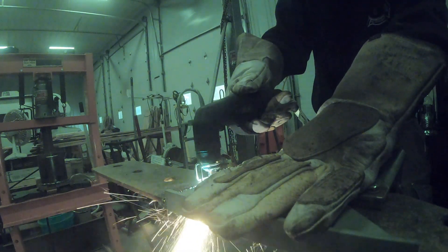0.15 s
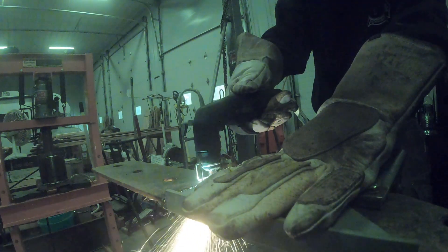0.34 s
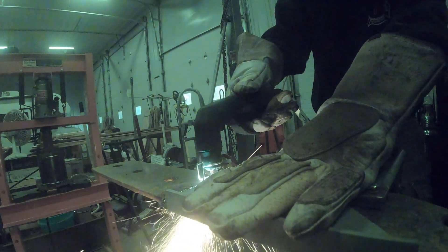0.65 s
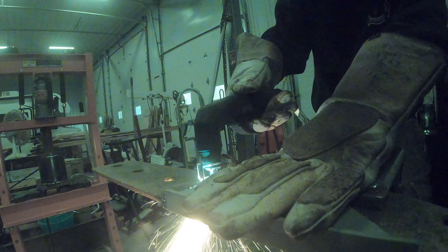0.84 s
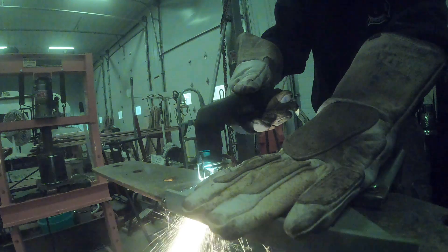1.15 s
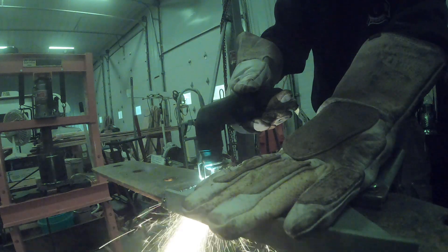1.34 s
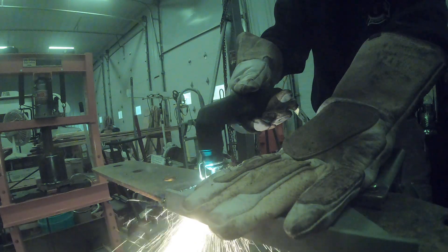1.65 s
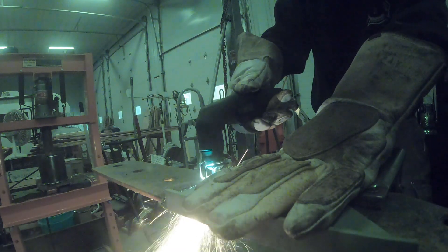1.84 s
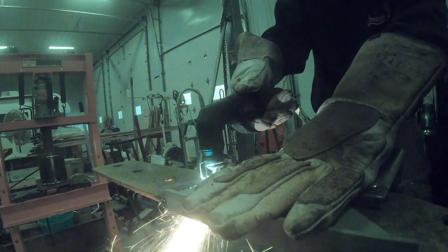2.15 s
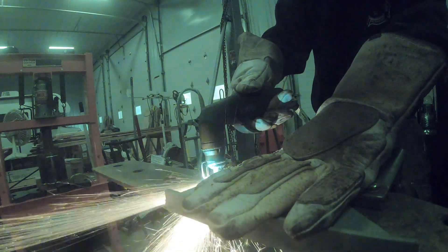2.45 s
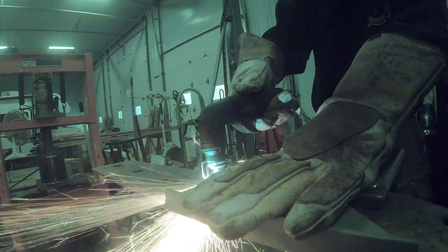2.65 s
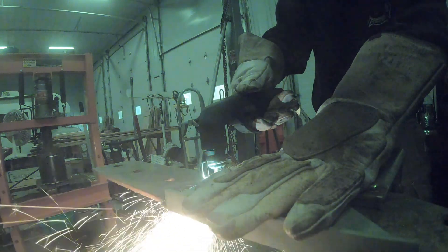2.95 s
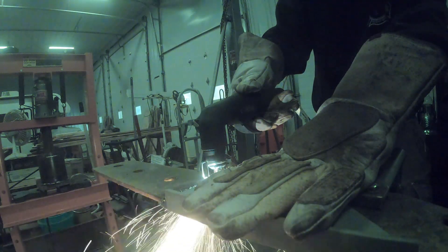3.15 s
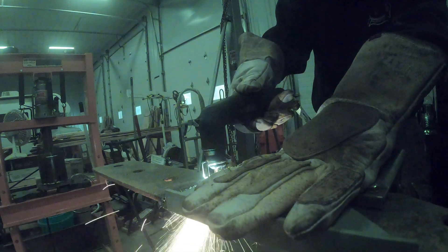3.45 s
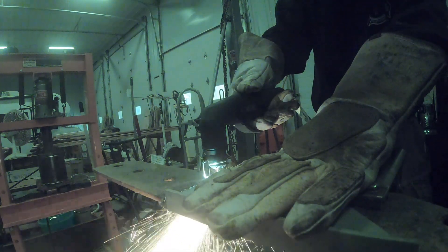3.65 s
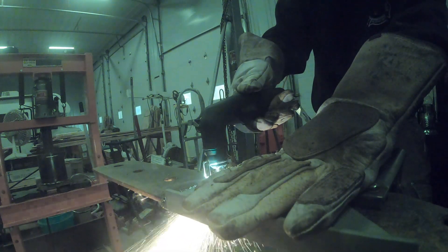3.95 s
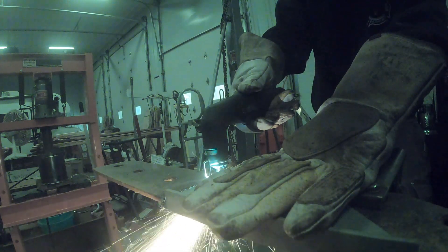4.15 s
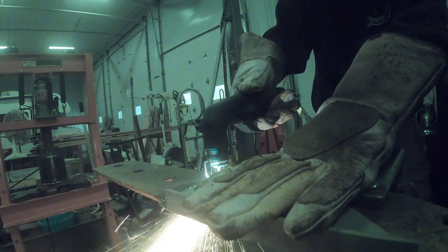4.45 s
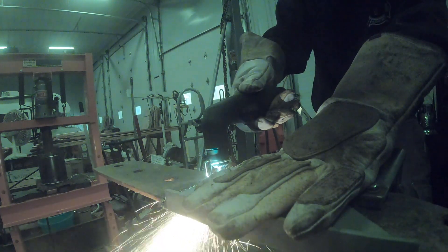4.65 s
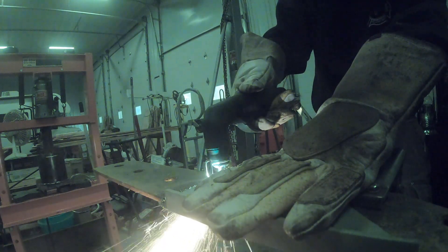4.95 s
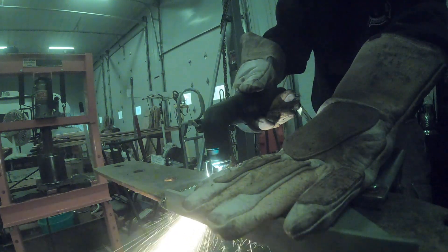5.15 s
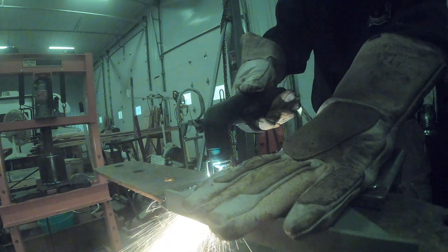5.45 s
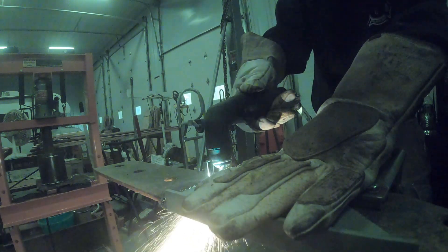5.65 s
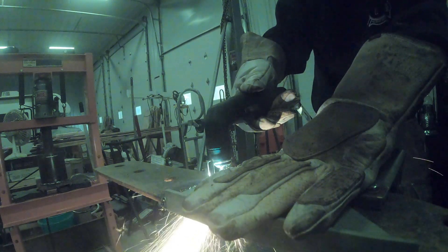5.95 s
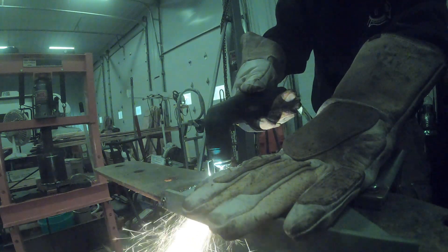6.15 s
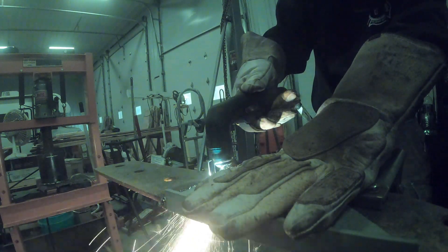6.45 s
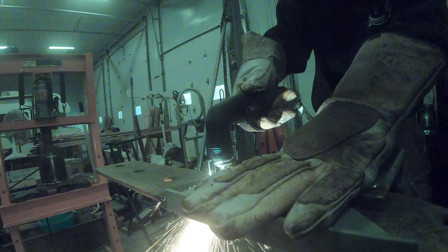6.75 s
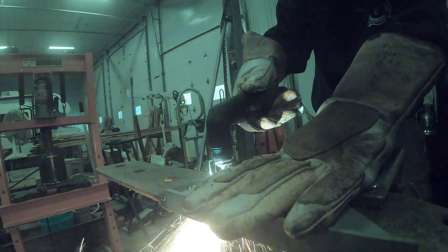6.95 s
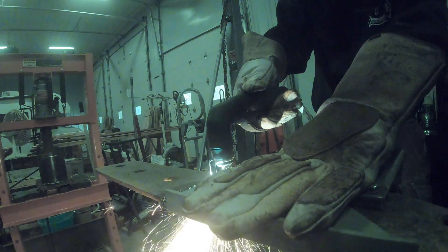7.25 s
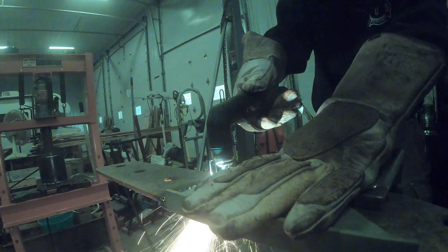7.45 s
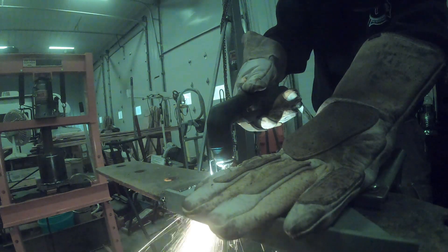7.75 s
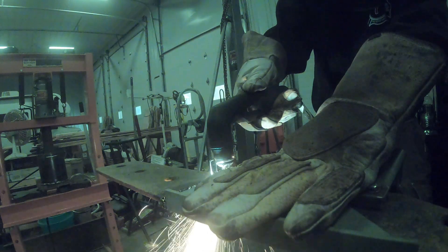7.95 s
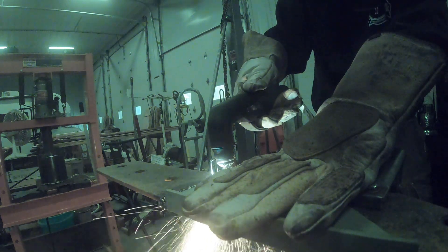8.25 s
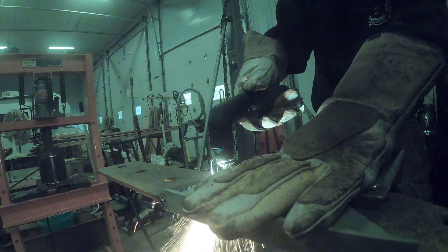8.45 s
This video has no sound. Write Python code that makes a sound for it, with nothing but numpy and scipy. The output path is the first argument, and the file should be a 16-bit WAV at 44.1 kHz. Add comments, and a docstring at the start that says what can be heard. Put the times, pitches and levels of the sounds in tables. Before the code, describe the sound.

Close, continuous rushing torch noise in a workshop, bright and rough, briefly choking into a hollow dip and rise, then sputtering with small puffs.

```python
"""Plasma torch cutting thick plate

A plasma torch is drawn through a thick steel plate, an arm's length away in a workshop with a faint fan.
Its air jet, shaped noise in bands, roars in the kerf and hisses at the nozzle; plate, torch and bench colour it.
Molten slag makes the jet splutter and puff: the bands waver in level and brief hollow noises swell up.
Once the kerf chokes: the jet blows back as a swooping resonance in noise, over a low, broad rumble."""
import sys
import numpy as np
from scipy import signal
from scipy.fft import rfft, irfft, next_fast_len
from scipy.io import wavfile
from scipy.ndimage import map_coordinates

SR = 44100
rng = np.random.default_rng(int(sys.argv[2]) if len(sys.argv) > 2 else 0)


def pcm_store(signal):
    """Save signal as 16-bit PCM."""
    levels = np.round(np.clip(np.atleast_2d(signal), -1, 1) * 32767)
    wavfile.write(sys.argv[1], SR, levels.astype(np.int16).T)


N = 378800


def amp(db):
    """Decibels to gain."""
    return 10 ** (np.asarray(db) / 20)


def unit(x):
    """Scale to rms 1; a stereo pair by its centre signal."""
    centre = np.atleast_2d(x).mean(0)
    return x / np.sqrt(np.mean(centre ** 2) + 1e-20)


def curves(rows):
    """One value per sample for each column after the time."""
    times, *columns = np.transpose(rows)
    t = np.arange(N) / SR
    return [np.interp(t, times, column) for column in columns]


def along(rows, hz):
    """Each column of a table that starts with f/Hz, read on a log frequency axis."""
    f, *columns = np.transpose(rows)
    return np.array([np.interp(np.log(hz + 1), np.log(f.real + 1), column) for column in columns])


def wobble(rate):
    """A smooth random curve about zero, rate knots a second."""
    coarse = np.arange(0, N, 16)
    knots = rng.standard_normal(int(N * rate / SR) + 4)
    curve = map_coordinates(knots, [coarse * rate / SR])
    return np.interp(np.arange(N), coarse, curve)


def swell(s, half_s):
    """A smooth rise to 1 at time s, and the fall back."""
    start = max(0, int((s - 4 * half_s) * SR))
    stop = min(N, int((s + 4 * half_s) * SR))
    near = np.arange(start, stop)
    shape = np.zeros(N)
    shape[near] = np.exp(-((near / SR - s) / half_s) ** 2)
    return shape


def band(x, low_hz, high_hz, order=8):
    """The part of x between two edges, at rms 1."""
    size = next_fast_len(N + 8192, True)
    hz = np.fft.rfftfreq(size, 1 / SR) + 1
    low_cut = 1 + (low_hz / hz) ** (2 * order)
    high_cut = 1 + (hz / high_hz) ** (2 * order)
    return unit(irfft(rfft(x, size) / (low_cut * high_cut), size)[..., :N])


def hollow(times, pitch_hz, width_octaves):
    """Noise of rms 1 in one resonance that moves from pitch to pitch."""
    hz, t, z = signal.stft(rng.standard_normal(N), SR, nperseg=1024)
    centre = np.interp(t, times, pitch_hz)
    width = np.interp(t, times, width_octaves)
    octaves = np.log2((hz[:, None] + 1) / centre)
    # a higher resonance spans more Hz, so it is turned down to match
    gain = np.exp(-(octaves / width) ** 2 / 2) / np.sqrt(centre)
    return unit(signal.istft(z * gain, SR, nperseg=1024)[1][:N])


def fan(hum_hz=175, hum_db=-57.5, drift=0.65):
    """A cooling fan hums as one faint sine, unsteady in phase (drift in radians) and level."""
    phase = 2 * np.pi * hum_hz * np.arange(N) / SR + drift * wobble(12)
    return amp(hum_db + 2.4 * wobble(7)) * unit(np.sin(phase))


# how fast the workshop's echo dies (to -60 dB): [f/Hz, t/s]
SHOP_DECAY = [(150, 0.28), (2000, 0.34), (12000, 0.066)]


def workshop(x, wet_db=-21):
    """Walls and machines answer with a tail of decaying noise; the treble dies first."""
    hz, t, z = signal.stft(rng.standard_normal((2, SR // 2)), SR, nperseg=256)
    t60 = along(SHOP_DECAY, hz)[0][:, None]
    tail = signal.istft(z * amp(-60 * t / t60), SR, nperseg=256)[1]
    return amp(wet_db) * signal.fftconvolve(x, tail / np.linalg.norm(tail[0]), axes=1)[:, :N]


def bench(x, scatter_db=-26, t60=0.056):
    """Plate, glove and bench scatter the jet, rippling its colour alike at both ports."""
    t = np.arange(SR // 10) / SR
    echoes = rng.standard_normal(len(t)) * amp(-60 * t / t60) * (t > .004)
    echoes = echoes[None] / np.linalg.norm(echoes)
    return x + amp(scatter_db) * signal.fftconvolve(x, echoes, axes=1)[:, :N]


# the kerf chokes once, quickly closing and clearing
CHOKE_START_S, CHOKE_END_S, CHOKE_ATTACK_S, CHOKE_RELEASE_S = 2.312, 3.04, 0.03, 0.075


def churn(level_db=-42.5, rise_s=0.25, ebb_s=0.05, lumps_db=1.2):
    """Air trapped under the choked kerf rumbles low and broad, and ebbs once the kerf clears."""
    t = np.arange(N) / SR
    rise = np.clip((t - CHOKE_START_S) / rise_s, 0, 1)
    envelope = rise / (1 + np.exp((t - CHOKE_END_S) / ebb_s))
    rumble = band(rng.standard_normal(N), 125, 290, order=3)
    return envelope * amp(level_db + lumps_db * wobble(25)) * rumble


def choke():
    """How far the kerf is shut and how deep the jet digs in, both 0-1: the deeper, the lower the hollow."""
    t = np.arange(N) / SR
    closing = (t - CHOKE_START_S) / CHOKE_ATTACK_S
    clearing = (CHOKE_END_S - t) / CHOKE_RELEASE_S
    shut = np.clip(np.minimum(closing, clearing), 0, 1)
    pitch_hz = curves(BLOWBACK_SWOOP)[0]
    sunk = np.log(pitch_hz.max() / pitch_hz)
    return shut, shut * sunk / sunk.max()


# the hollow in the choked kerf sinks and narrows, then climbs and widens again:
# [t/s, resonance f/Hz, width/octaves, level/dB]
BLOWBACK_SWOOP = [(2.33, 600, .8, -40), (2.395, 490, .65, -30), (2.46, 260, .5, -39),
                  (2.55, 170, .48, -34.3), (2.63, 185, 0.36, -31.5), (2.73, 230, .38, -36.5),
                  (2.81, 295, .33, -33.3), (2.87, 430, .7, -40.5), (2.94, 580, .8, -33),
                  (2.99, 560, .9, -37.5)]
# slag briefly plugs the kerf:
# [t/s, half length t/s, hollow resonance f/Hz, hollow level/dB, splutter lift level/dB]
SLAG_PUFFS = [(1.55, .035, 950, -36, 4), (1.83, .03, 1100, -31, -4), (3.63, .025, 180, -43, 2),
              (3.75, .025, 730, -40, 0), (4.058, .035, 800, -35, 3.5), (4.16, .025, 880, -30, 1),
              (4.55, .035, 180, -46, -3), (4.84, .018, 190, -43, 1), (4.92, .04, 310, -46, 3),
              (5.045, .025, 860, -29.5, 0), (5.515, .02, 280, -49, 4), (5.80, .025, 170, -42, 1),
              (5.89, .018, 700, -36, 4), (5.95, .035, 280, -44.5, 2.5), (6.015, .018, 720, -39, 1),
              (6.21, .012, 220, -41, 2), (6.71, .014, 220, -43, 3), (6.775, .02, 160, -44, 3),
              (6.94, .025, 430, -43, 3), (7.03, .02, 300, -44, 2), (7.265, .02, 540, -36, 5),
              (7.31, .012, 600, -40, -1), (7.453, .018, 240, -43, 2.5), (8.294, .035, 180, -45.5, 1.5),
              (8.48, 0.046, 1050, -33, -1)]


def blowback(balance_db=-2, sputter_db=1.4, puff_octaves=0.58):
    """Air turned back by steel or slag sounds a hollow: once in a long swoop, often in a puff."""
    shut, _ = choke()
    times, pitch_hz, width, _ = np.transpose(BLOWBACK_SWOOP)
    swoop_level = amp(curves(BLOWBACK_SWOOP)[-1])
    swoop = shut * swoop_level * hollow(times, pitch_hz, width)

    # each puff holds its own pitch from its start to its end
    edges = sorted((s + side * half_s, hz) for s, half_s, hz, _, _ in SLAG_PUFFS for side in (-1, 1))
    times, pitch_hz = np.transpose(edges)
    plugs = sum(amp(db) * swell(s, half_s) for s, half_s, _, db, _ in SLAG_PUFFS)
    puffs = plugs * hollow(times, pitch_hz, np.full(len(times), puff_octaves))

    left_right = amp([[balance_db / 2], [-balance_db / 2]])
    return (swoop + puffs) * amp(sputter_db * wobble(70)) * left_right


# jet noise colour: [f/Hz, level/dB per Hz]
AIR_COLOUR = [(25.0, -49), (65.0, -23), (150.0, -19), (350.0, -14), (600.0, -12.5), (1500.0, -9),
              (1800.0, -6.5), (3700.0, 0.6), (4300.0, -9), (7000.0, -6), (9000.0, -8.5), (10800.0, -22),
              (12400.0, -25.5), (15000.0, -43)]
# resonances around the torch: [f/Hz, half width f/Hz, lift level/dB]
TORCH_RESONANCES = [(147.5, 12.3, 7.5), (231, 59, 4.5), (494, 45, 3.5), (717, 61, 5.5), (868, 18, 4),
                    (950.5, 58, 10), (1098, 35, 6), (1167, 31.5, 9.5), (1255, 30, 2.5), (1350, 50, 5),
                    (1525, 26, 2.5), (1680, 44, 3.5), (1795, 45, 4), (1905, 61, 7.5), (2050, 58, 5),
                    (2320, 35, 2), (2417, 33, 4), (2483, 37, 6.5), (2562, 28, 4), (2810, 25, 3),
                    (3040, 58, 3), (3190, 31, 3.5), (3310, 22, 3), (3460, 30, 2), (3710, 25, 3.5),
                    (4770, 85, 4), (5377, 160, 4.5), (6240, 70, 4), (6550, 270, 4), (8174, 123, 8.5),
                    (8410, 86, 5.5), (8820, 130, 3.5), (12100, 540, 4.5), (13975, 172, 7)]
# the two microphone ports: [f/Hz, likeness 0-1, left lead/radians, left minus right level/dB]
PORT_PAIR = [(50, 0.73, -0.18, -0.9), (300, 0.99, 0.03, -2.7), (900, 0.96, 0.47, -0.6),
             (1000, 0.93, 0.76, -1.3), (1100, 0.94, 0.34, 2.2), (1200, 0.9, 0.86, -2.9),
             (1300, 0.93, 0.87, 4.2), (1400, 0.56, 1.22, -4.9), (1500, 0.14, -0.11, 1.8),
             (1600, 0.16, -0.65, -1.7), (1700, 0.88, -0.91, 0.9), (2100, 0.99, -0.15, 0.3),
             (2200, 0.78, -0.52, 0.8), (2500, 0.9, 0.18, -0.9), (2800, 0.17, -0.18, 0.9),
             (2900, 0.41, 1.37, 4.6), (3000, 0.51, -1.26, 4.7), (3300, 0.73, -0.14, 2.0),
             (3500, 0.96, 1.48, 0.6), (3900, 0.9, 2.15, -4.3), (4400, 0.51, 2.44, -3.7),
             (4650, 0.54, 0.79, -7.4), (4800, 0.55, -1.81, -4.5), (5400, 0.84, -3.0, 4.0),
             (5550, 0.25, -0.28, -4.3), (5850, 0.25, 2.15, -6.5), (6150, 0.59, -1.85, -12.2),
             (6600, 0.76, -2.26, 1.6), (7050, 0.28, -1.6, 3.3), (7200, 0.55, -1.63, -6.1),
             (7500, 0.61, -0.45, 2.0), (7950, 0.66, -2.87, 7.4), (8100, 0.99, 2.63, 5.1),
             (8400, 0.38, 1.6, -3.4), (8550, 0.22, -3.01, 1.6), (9000, 0.7, 2.03, -4.3),
             (9150, 0.26, -0.24, -1.2), (11000, 0.31, -2.92, 2.0), (12000, 0.11, 0.19, -6.3),
             (14500, 0.11, -0.07, 2.3)]


def turbulence():
    """Jet noise through the resonances, as the two ports hear it."""
    size = next_fast_len(N, True)
    hz = np.fft.rfftfreq(size, 1 / SR)
    colour_db = along(AIR_COLOUR, hz)[0]
    colour_db = colour_db + sum(db * np.exp(-((hz - f) / width) ** 2) for f, width, db in TORCH_RESONANCES)
    # reflections off plate and glove reach the ports in or out of step
    likeness = [(f, min(alike, 1) * np.exp(1j * lead), db) for f, alike, lead, db in PORT_PAIR]
    cross, balance_db = along(likeness, hz)
    right, other = rfft(rng.standard_normal((2, size)))
    left = cross * right + np.sqrt(np.abs(1 - np.abs(cross) ** 2)) * other
    pair = np.array([left * amp(balance_db.real / 2), right * amp(-balance_db.real / 2)])
    return irfft(pair * amp(colour_db), size)[:, :N]


# how hard the slag splutters under the plate: [t/s, level/dB about the usual]
SLAG_SPLUTTER = [(0, -3.5), (0.7, -2.2), (1.55, -2.5), (2.15, -3), (2.5, -2.5), (3.42, -1.5), (3.65, -1.5),
                 (4.0, -0.5), (4.4, -1), (5.0, 0), (5.18, -2.5), (5.4, -1), (5.9, 1.4), (6.45, -1),
                 (6.8, 2), (7.4, -0.5), (7.62, -3), (7.8, 0), (8.3, 1), (8.59, 0.5)]
# the deep rumble: [t/s, level/dB about the usual]
DEEP_RUMBLE = [(0, -4), (0.35, -7), (0.52, 1), (0.85, 1), (1.3, -4), (1.52, 4), (1.8, -2.5), (2.15, -4),
               (2.55, 5), (2.95, -3), (3.15, -4), (3.5, -5), (3.8, 0), (4.8, 0.5), (6.0, 2), (6.6, -1),
               (6.8, 2), (8.59, -1)]


def kerf(air, tilt_db, flare_db, rumble_db=-58.0, splutter_db=-41.5, ring_db=-32.5, roar_db=-27.0,
         drops_db=0.7, choke_splutter_db=5.0, choke_ring_db=2.5, choke_roar_db=2.0):
    """Slag makes the jet splutter, rumble and ring the plate; the roar grows as the jet digs into a choked kerf."""
    shut, depth = choke()
    puff_db = sum(db * swell(s, half_s) for s, half_s, _, _, db in SLAG_PUFFS)
    slag_db = curves(SLAG_SPLUTTER)[0] + puff_db
    drops = drops_db * wobble(45)  # drops of melt briefly narrow the kerf

    rumble_level = rumble_db + curves(DEEP_RUMBLE)[0] + 0.5 * puff_db + 2.0 * wobble(12)
    rumble = amp(rumble_level) * band(air, 15, 120.0)

    splutter_level = splutter_db + slag_db + choke_splutter_db * shut + drops + 0.41 * wobble(9)
    splutter = amp(splutter_level) * band(air, 118, 656)

    ring_level = ring_db + 0.28 * slag_db + 0.23 * tilt_db + choke_ring_db * shut + 0.29 * drops
    ring = amp(ring_level) * band(air, 633, 1454)

    roughness_db = 0.3 * wobble(25) + 0.46 * wobble(220)
    roar_level = roar_db - 0.61 * tilt_db + choke_roar_db * depth + flare_db + roughness_db
    roar = amp(roar_level) * band(air, 1502, 2694)
    return rumble + splutter + ring + roar


def nozzle(air, tilt_db, rush_flare_db, hiss_flare_db, rush_db=-28.0, hiss_db=-32.5, fizz_db=-32.5,
           flutter_db=1.0, sizzle_db=1.0, choke_rush_db=-1.0, choke_fizz_db=-1.5):
    """Air rushes and hisses at the nozzle, shaken by the wandering arc and dulled when the kerf chokes."""
    shut, depth = choke()
    arc = flutter_db * wobble(18) + sizzle_db * wobble(400)

    rush_shake_db = 0.23 * wobble(18) + 0.28 * wobble(300)
    rush_level = rush_db - 0.13 * tilt_db + choke_rush_db * shut + rush_flare_db + rush_shake_db
    rush = amp(rush_level) * band(air, 2663, 4380)

    hiss = amp(hiss_db + tilt_db + hiss_flare_db + 0.51 * arc) * band(air, 4000, 7760)

    shimmer_db = 0.26 * arc + 0.63 * wobble(18) + .41 * wobble(300)
    fizz_level = fizz_db + 0.17 * tilt_db + choke_fizz_db * depth + shimmer_db
    fizz = amp(fizz_level) * band(air, 7830, 17000)
    return rush + hiss + fizz


# tilt of the jet's colour as the torch travels; above zero more hiss and less roar: [t/s, level/dB]
JET_TILT = [(0, -0.8), (0.3, -1), (1.2, 0.5), (1.5, 1.5), (2.1, -0.5), (2.25, 1), (2.39, 2), (2.55, 0.1),
            (3.3, 0.2), (3.65, 2.5), (3.85, 0.2), (4.05, 1.4), (4.85, 1.4), (6.2, -0.1), (6.5, -1),
            (6.85, 0.2), (7.75, -1.1), (8.59, -1)]
# the jet briefly flares or falters:
# [t/s, half length t/s, roar lift level/dB, rush lift level/dB, hiss lift level/dB]
JET_FLARES = [(0.24, 0.05, 0, 2.3, -1.5), (0.77, 0.035, 0, -1, 3), (0.93, 0.037, 0.5, 0.4, 0),
              (1.48, 0.04, -1, -3, 1), (1.78, 0.025, -1.8, -1, 1), (1.86, 0.02, -0.5, -1, 4),
              (2.173, 0.022, -2.2, -1, -1), (2.39, 0.06, 0.5, -2.5, -0.5), (2.55, 0.08, 1.0, 0.4, -0.5),
              (2.775, 0.035, 1.3, 0, 0), (3.05, 0.13, -1, 1.1, 0.5), (3.453, 0.025, 2, 2, -1),
              (4.99, 0.025, 1.5, 0, -1), (5.65, 0.03, -0.5, 0.5, -3), (7.98, 0.053, 2, -0.5, -1),
              (8.445, 0.025, 3, 0, 0)]


def jet():
    """One stream of air roars in the kerf and hisses at the nozzle; its tilt trades one for the other."""
    air = turbulence()
    tilt_db, = curves(JET_TILT)
    swells = np.array([swell(s, half_s) for s, half_s, *_ in JET_FLARES])
    roar_db, rush_db, hiss_db = np.array(JET_FLARES)[:, 2:].T @ swells
    return kerf(air, tilt_db, roar_db) + nozzle(air, tilt_db, rush_db, hiss_db)


def waver(x, patchy_db=1.2, patch_hz=80, shifts_per_s=6.0):
    """As the torch moves and the kerf changes shape, each patch of the spectrum swells and fades on its own."""
    hz, t, z = signal.stft(x, SR, nperseg=2048)
    knots = rng.standard_normal((400, 100))
    places = np.meshgrid(hz / patch_hz, t * shifts_per_s, indexing="ij")
    patches = map_coordinates(knots, places, mode="mirror")
    return signal.istft(z * amp(patchy_db * patches), SR, nperseg=2048)[1][:, :N]


def scene():
    """The torch close by, the fan and the room behind it."""
    torch = bench(waver(jet()) + blowback() + churn())
    return torch + workshop(torch) + fan()


def record(dry, top_hz=15250):
    """A steep band limit leaves nothing above top_hz."""
    size = next_fast_len(N + SR // 2)
    keep = np.fft.rfftfreq(size, 1 / SR) < top_hz
    return irfft(rfft(dry, size) * keep, size)[:, :N]


dry = scene()
out = record(dry)
pcm_store(out)
```